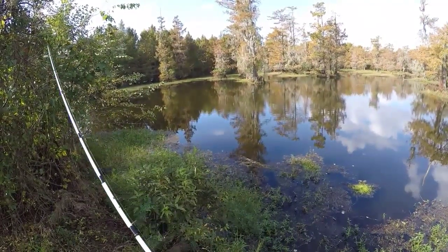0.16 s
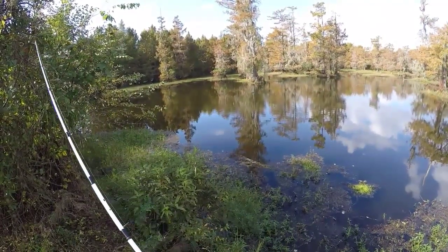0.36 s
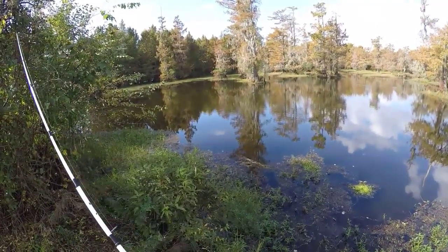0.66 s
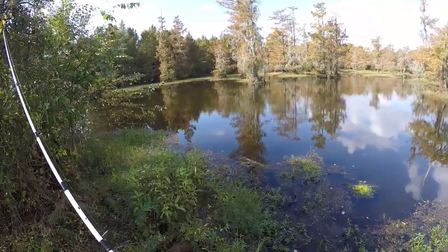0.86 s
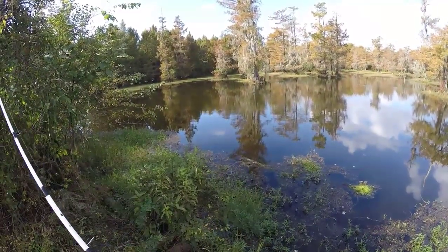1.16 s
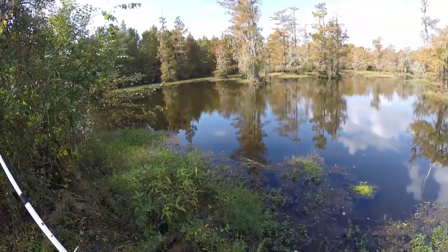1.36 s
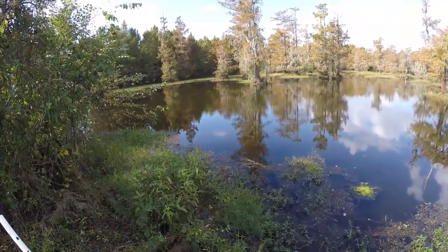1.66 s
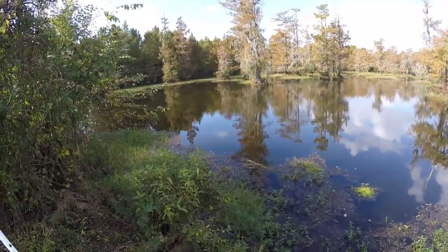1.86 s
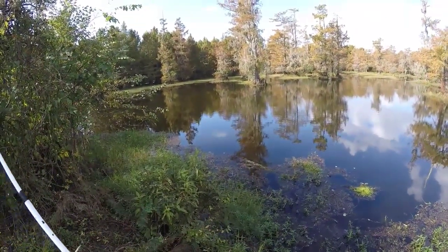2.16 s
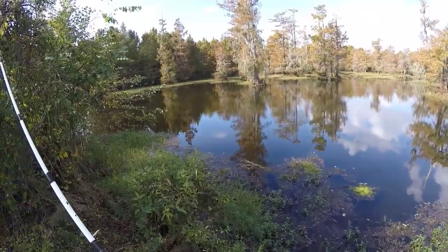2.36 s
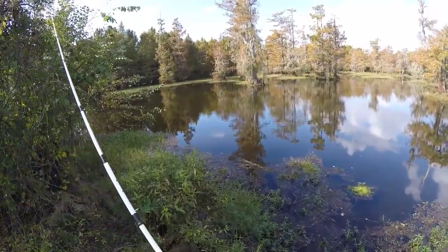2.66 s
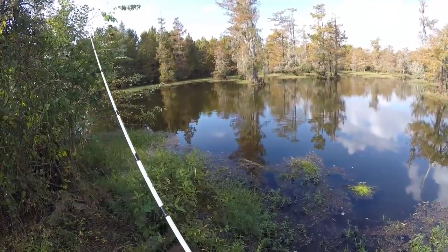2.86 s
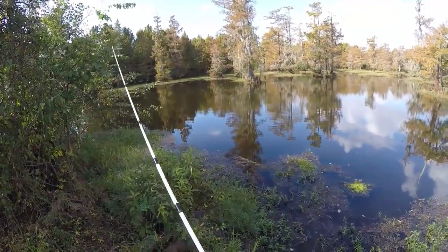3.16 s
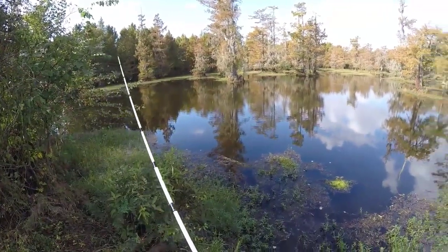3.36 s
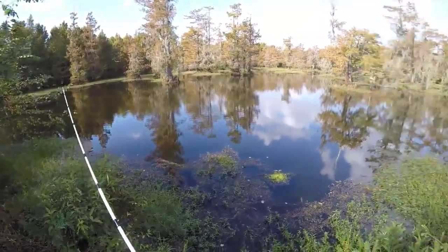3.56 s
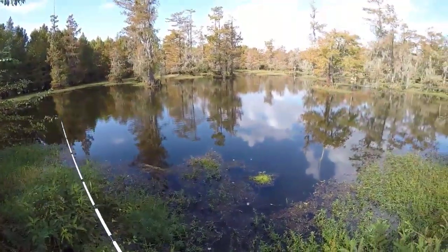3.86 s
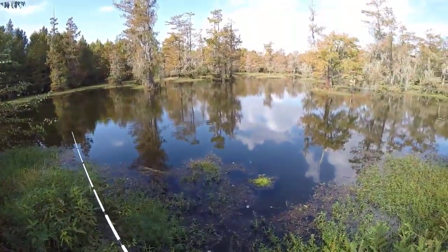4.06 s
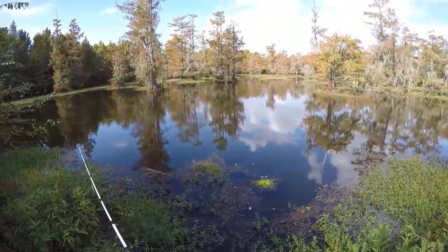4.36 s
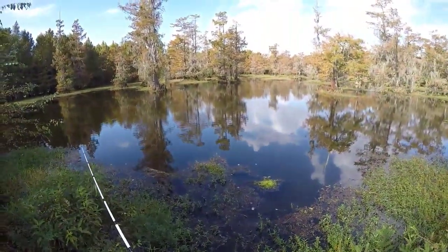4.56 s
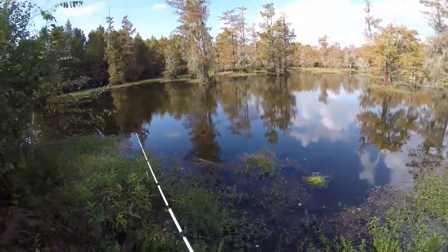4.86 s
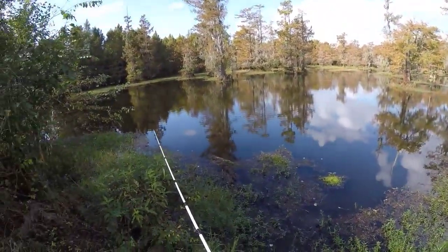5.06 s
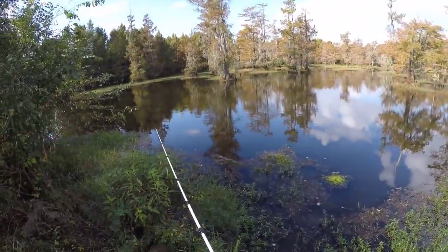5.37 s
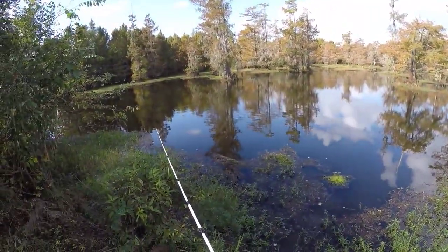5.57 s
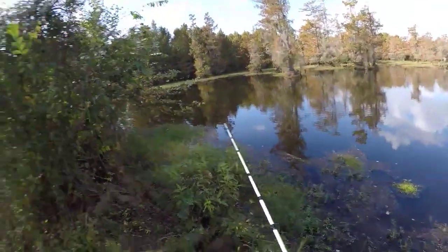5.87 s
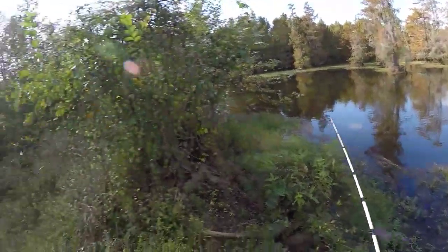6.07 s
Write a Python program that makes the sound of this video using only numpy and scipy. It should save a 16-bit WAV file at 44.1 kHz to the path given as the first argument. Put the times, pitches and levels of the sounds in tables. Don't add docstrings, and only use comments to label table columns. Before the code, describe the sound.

Far traffic rumble and a steady engine drone behind faint high cricket chirps and a dry katydid buzz, with one sharp handling knock midway.

```python
import sys
import numpy as np
from scipy import signal
from scipy.fft import rfft, irfft, next_fast_len
from scipy.io import wavfile
from scipy.ndimage import uniform_filter1d, map_coordinates

SR = 44100
rng = np.random.default_rng(int(sys.argv[2]) if len(sys.argv) > 2 else 0)


def natural_amplitude(level_db):
    exponent = np.asarray(level_db, float) / 20
    return 10 ** exponent


def generate_wav(signal):
    frames = np.transpose(np.atleast_2d(signal))
    scaled = np.clip(frames, -1, 1) * 32767
    pcm = np.round(scaled).astype(np.int16)
    wavfile.write(sys.argv[1], SR, pcm)


N = 273420


def unit(x):
    return x / np.sqrt(np.mean(x ** 2) + 1e-20)


def curves(rows):
    s, *columns = np.transpose(rows)
    return [np.interp(np.arange(N) / SR, s, column) for column in columns]


def wobble(rate):
    knots = rng.standard_normal(int(N * rate / SR) + 4)
    return map_coordinates(knots, [np.arange(N) * rate / SR])


def bumps(rows):
    t = np.arange(N) / SR
    return sum(height * np.exp(-((t - s) / width) ** 2) for s, width, height in rows)


def add(track, s, piece):
    start = max(round(s * SR), 0)
    track[start:start + len(piece)] += piece[:max(len(track) - start, 0)]


def filtered(x, response):
    m = next_fast_len(N + SR // 2)
    return irfft(rfft(x, m) * response(np.fft.rfftfreq(m, 1 / SR)), m)[:N]


def resonances(modes):
    def response(f):
        total = 0
        for k, (centre, width, db) in enumerate(modes):
            damping = 1j * f * width
            total = total + (-1) ** k * natural_amplitude(db) * damping / (centre * centre - f * f + damping)
        return total
    return response


def ringing_noise(modes):
    return unit(filtered(rng.standard_normal(N), lambda f: resonances(modes)(f) ** 2))


def rush(spectrum, patchy_db):
    z = signal.stft(rng.standard_normal(N + 512), nperseg=512)[2]
    field = uniform_filter1d(rng.standard_normal(z.shape), size=6, axis=0)
    field = uniform_filter1d(field, size=14, axis=1)
    x = signal.istft(z * natural_amplitude(patchy_db * unit(field)), nperseg=512)[1][:N]
    hz, db = np.transpose(spectrum)
    return unit(filtered(x, lambda f: natural_amplitude(np.interp(np.log(f + 1), np.log(hz + 1), db))))


def note(length, start_hz, end_hz, sharp, bend):
    u = np.linspace(0, 1, max(round(length * SR), 8))
    turns = np.cumsum(start_hz + (end_hz - start_hz) * u ** bend) / SR + rng.random()
    return np.sqrt(2) * np.abs(np.sin(np.pi * u)) ** sharp * np.sin(2 * np.pi * turns)


def grass(x, t60):
    t = np.arange(SR // 2) / SR
    tail = rng.standard_normal(len(t)) * natural_amplitude(-60 * t / t60)
    return signal.fftconvolve(x, tail / np.linalg.norm(tail))[:N]


def distance():
    # (frequency [Hz], density [dB per Hz])
    rumble_colour = [(9, -44), (15, -3), (25, -2), (34, -4), (42, -3), (55, -0.5), (78, -2), (97, -10),
                     (130, -28), (300, -97)]
    exhaust_colour = [(60, -47), (95, -3.5), (112, 0.5), (142, -2), (152, -7.5), (190, -8.5), (210, -14),
                      (300, -22.5), (600, -59)]
    roar_colour = [(150, -36), (250, -7.5), (420, -8), (520, -7.5), (680, -1), (750, 1), (850, -4.5),
                   (1000, -12.5), (1250, -20), (1900, -30.5), (3200, -47), (6000, -56)]
    tyre_colour = [(600, -47), (900, -3), (1050, -0.5), (1300, -4.5), (1700, -11.5), (2400, -40),
                   (5000, -70)]
    air_colour = [(600, -42), (1500, 2.5), (3000, 0), (5600, -2.5), (7400, -5.5), (9200, -7), (14500, -9),
                  (16000, -9)]
    # (time [s], level [dB])
    lorries = [(0, -48), (.4, -45), (.75, -50), (1, -43.5), (1.35, -48), (1.9, -44.5), (2.6, -45.5),
               (3.1, -47), (4, -43), (4.7, -46.5), (5.2, -43.5), (5.75, -47.5), (6.2, -45.5)]
    # (time [s], hiss level [dB])
    cars = [
        (0, -65),
        (.65, -59.5),
        (1.8, -66),
        (3.6, -67),
        (4.2, -67),
        (4.85, -66),
        (5.4, -68.5),
        (6.2, -63),
    ]
    # (middle [s], half width [s], rise [dB])
    revs = [
        (.45, 0.34, 3),
        (1.45, 0.29, 3.3),
        (2.85, 0.38, 2.9),
        (3.55, 0.39, 4),
        (4.45, 0.24, 0.68),
        (5.8, 0.19, 2.4),
    ]

    (rumble_db,), (tyre_db,) = curves(lorries), curves(cars)
    rumble = natural_amplitude(rumble_db + 4.0 + 0.19 * wobble(5.4)) * rush(rumble_colour, patchy_db=0.48)
    idle = natural_amplitude(rumble_db - 4) * ringing_noise([(31.8, 11.7, 0)])
    exhaust = natural_amplitude(-53.5 + bumps(revs) + 3.0) * rush(exhaust_colour, patchy_db=0.0)
    roar_db = -51 + 0.087 * (tyre_db - tyre_db.mean())
    roar = natural_amplitude(roar_db - 0.9 + 0.057 * wobble(4.37)) * rush(roar_colour, patchy_db=1.33)
    tyres = natural_amplitude(tyre_db - 3.0) * rush(tyre_colour, patchy_db=3.5)
    air = natural_amplitude(-67) * rush(air_colour, patchy_db=0.47)
    return rumble + idle + exhaust + roar + tyres + air


def engine():
    # (shaft order [multiple of shaft rate], level [dB rms])
    drone = [(3, -65.5), (6, -79.5), (10, -76), (12, -67.5), (13, -78), (14, -60.5), (15, -71), (16, -61.5),
             (17, -70.5), (18, -60.5), (19, -66), (20, -95), (22, -78), (24, -74.5)]
    shaft_hz = 45.97
    turns = np.cumsum(shaft_hz + 0.026 * wobble(1.443)) / SR
    out = np.zeros(N)
    for order, db in drone:
        level = np.sqrt(2) * natural_amplitude(db + 1.1 * wobble(2.36))
        out += level * np.sin(2 * np.pi * (round(order) * turns + rng.random()))
    return out


def bird():
    # (time [s], level [dB])
    chips = [
        (.636, -65.5),
        (.656, -73),
        (.852, -76),
    ]
    pip_pitches = (5000, 4030)
    # (time [s], pitch [Hz], level [dB])
    warble = [
        (4.79, 3850, -95),
        (4.812, 3790, -76),
        (4.832, 3800, -82),
        (4.853, 3880, -70),
        (4.875, 3510, -77),
        (4.9, 3660, -75),
        (4.94, 3720, -79),
        (5.01, 3780, -86),
        (5.14, 3500, -88),
    ]

    pitch_hz, level_db = curves(warble)
    sings = np.arange(N) < warble[-1][0] * SR
    turns = np.cumsum(pitch_hz + 45 * wobble(50)) / SR
    out = np.sqrt(2) * sings * natural_amplitude(level_db + 3.3 * wobble(60)) * np.sin(2 * np.pi * turns)
    for s, db in chips:
        add(out, s, natural_amplitude(db) * note(.015, 5050, 4400, sharp=.6, bend=1))
    for k in range(3):
        for hz in pip_pitches:
            add(out, 4.782 + .061 * k, natural_amplitude(-70 - 4.5 * k) * note(.03, hz, hz, sharp=0.76, bend=1))
    echo = np.roll(grass(out, t60=.3), round(.025 * SR))
    return out * natural_amplitude(wobble(70)) + natural_amplitude(-4) * echo


def chirp(length, db, hz, period, sag_hz, scatter_db):
    out = np.zeros(SR // 8)
    for k, t in enumerate(np.linspace(0, length, round(length / period) + 1)):
        pitch_hz = hz + rng.normal(0, 30)
        size = natural_amplitude(db - 2.5 - 2 * (k == 0) + rng.normal(0, scatter_db))
        add(out, t, size * note(0.0068, pitch_hz + 70, pitch_hz - sag_hz, sharp=0.39, bend=5.4))
    return out


def crickets():
    near = [
        0.0844,
        0.433,
        0.822,
        1.2196,
        1.5805,
        1.946,
    ]
    # (time [s], length [s], level [dB])
    steady = [(.218, .057, -65), (0.495, .07, -66.5), (.7556, .06, -68), (1.036, 0.049, -65.5),
              (1.305, .088, -68), (1.825, .055, -68), (2.0856, .055, -65.5), (2.3436, .042, -68),
              (2.5775, .06, -67), (2.818, .055, -66), (3.058, .052, -66), (3.311, .046, -66.5),
              (3.562, .045, -67), (3.819, .03, -70), (4.0416, .055, -69), (4.267, 0.043, -71),
              (4.4817, .047, -67.5), (4.735, .068, -70), (5.061, .047, -67), (5.32, .045, -66),
              (5.5686, .049, -66.5), (5.8315, .053, -68), (6.076, .098, -66)]
    brief = [.002, .385, .7132, .8775, 1.1994, 1.5435, 1.7409, 1.9168, 2.302, 2.4858, 2.68, 4.192, 4.345,
             4.6, 4.915, 5.1871, 5.4494, 5.6924, 5.807, 5.9474, 5.965]
    # (time [s], level [dB], pitch [Hz])
    far = [(.51, -70, 7900), (.525, -74, 7350), (.79, -70, 7950), (.74, -76, 7400), (.93, -76, 7400),
           (1.095, -71, 7860), (1.15, -73, 7350), (1.37, -74, 7450), (1.424, -71, 7950), (1.593, -71, 7500),
           (5.39, -75, 8000), (5.92, -76, 8800), (5.975, -73, 8000), (6.065, -66, 7700), (6.115, -69, 9150),
           (6.12, -71, 7600)]

    brief_run = [3.1615 + .1228 * k for k in range(7)]
    others = [(s, length, db, 8265) for s, length, db in steady]
    others += [(s, 0.019, -70, 8340) for s in brief + brief_run]
    others += [(s, .036, db, hz) for s, db, hz in far]

    out = np.zeros(N)
    lead = .0037
    for s in near:
        add(out, s - lead, chirp(.05, -59.5, 8560, period=.0099, sag_hz=380, scatter_db=.8))
    for s, length, db, hz in others:
        add(out, s - lead, chirp(length, db, hz, period=.0092, sag_hz=1150, scatter_db=1.8))
    return out + natural_amplitude(-9) * grass(out, t60=.12)


def wing_noise(modes):
    scrape = rush([(7000, -60), (9600, -4), (11000, 3), (16000, 0)], patchy_db=0.8)
    return unit(filtered(scrape, resonances(modes)))


def katydid():
    # (start [s], end [s], level [dB], lag at start [strokes], lag at end [strokes], brightness [dB])
    songs = [
        (-1, 2.37, -74, 0.28, .39, -2.5),
        (4.12, 6.22, -73.5, .46, 0.23, -1.5),
    ]
    # (time [s], peak level [dB])
    ticks = [
        (2.4498, -71),
        (2.5227, -69),
        (2.913, -57),
        (3.1313, -59),
        (3.267, -58),
    ]
    # (time [s], peak level [dB])
    snaps = [
        (2.9871, -61),
        (3.0485, -59),
    ]
    # (frequency [Hz], width [Hz], level [dB])
    wing = [(10200, 500, -5), (11330, 400, -2), (11800, 160, -7), (12220, 230, -2.5), (12720, 220, -5),
            (13200, 290, -8)]
    wing_tip = [(13100, 500, -11), (13720, 220, 5), (14600, 450, 2), (15200, 500, 4)]
    stroke_hz, swell_db = 26.9, 9

    t = np.arange(N) / SR
    effort, bright_db = np.zeros(N), np.zeros(N)
    for start, end, db, lag_from, lag_to, tip_db in songs:
        warming = np.clip(1 + (start - t) / 0.55, 0, 1)
        fade_db = 60 * np.clip(t - end + 0.22, 0, None)
        level = (t > start) * natural_amplitude(db - swell_db * warming ** 2 - fade_db)
        tiring = 0.28 * np.clip(1 + (t - end) / .35, 0, None) ** 2
        lag = np.interp(t, [start, end], [lag_from, lag_to]) + tiring
        stroke = (.5 + .5 * np.cos(2 * np.pi * (stroke_hz * t - lag))) ** 0.71
        effort += level * (0.24 + stroke) * 1.14
        bright_db += (tip_db - swell_db * warming) * ((t > start) & (t < end))

    tick_run = [(3.375 + .1053 * k, -58.5) for k in range(7)]
    for s, db in ticks + tick_run:
        add(effort, s - .006, natural_amplitude(db - 12.0) * np.hanning(round(SR * .0336)) ** 0.34)
    early = effort * natural_amplitude(1.1 * wobble(25)) * wing_noise(wing)
    late_effort = np.roll(effort, round(0.0065 * SR))
    late = late_effort * natural_amplitude(bright_db + 1.2 * wobble(25)) * wing_noise(wing_tip)

    snap_level = np.zeros(N)
    for s, db in snaps:
        add(snap_level, s - .002, natural_amplitude(db - 5) * np.hanning(round(.009 * SR)))
    return early + late + snap_level * ringing_noise([(14800, 1100, 0)])


def rustle():
    # (frequency [Hz], density [dB per Hz])
    sleeve = [(300, -30), (800, -5), (1200, -10), (1650, 7), (2100, -6), (2500, -3), (3500, -11),
              (5000, -12), (7000, -32), (12000, -58)]
    # (middle [s], half width [s], level [dB])
    rubs = [
        (5.9, 0.025, -63),
        (6.025, 0.044, -60.5),
        (6.17, 0.028, -62),
    ]
    strokes = bumps([(s, width, natural_amplitude(db)) for s, width, db in rubs])
    return strokes * natural_amplitude(1.6 * wobble(150)) * rush(sleeve, patchy_db=1.5)


def knocks():
    # (time [s], level [dB], contact time [ms], crack level [dB])
    taps = [(3.4893, -12.5, 0.54, -35.5), (3.4938, -26, .9, -68), (3.494, -24, 1.35, -70),
            (3.506, -22, 1.4, -69), (3.486, -40, .3, -49), (5.8815, -24.5, 0.99, -57),
            (5.8832, -25, 0.66, -47), (5.886, -34, 0.75, -72), (5.8891, -27.5, 0.55, -47),
            (5.892, -30, 2.2, -59), (5.895, -39, 0.5, -55), (6.1032, -42, 0.25, -56)]
    # (frequency [Hz], width [Hz], level [dB])
    case = [(142, 45, -3), (370, 84, -1), (478, 42, 2), (800, 330, 6.5), (990, 540, -5.5), (1760, 50, -0.5),
            (2570, 220, -1), (3320, 690, -15)]
    # (time [s], length [s], pitch [Hz], level [dB])
    nudges = [(3.284, 0.016, 714, -35), (3.29, 0.011, 900, -44.5), (3.392, 0.016, 760, -38.5),
              (3.405, 0.026, 670, -43), (3.473, 0.011, 750, -41), (3.4873, 0.0034, 1670, -26.5),
              (3.488, 0.0037, 2980, -39.5), (5.8804, 0.0042, 1560, -36.5), (5.882, 0.012, 670, -37.5),
              (5.886, 0.0078, 200, -43), (5.887, 0.01, 2930, -54), (6.1012, 0.0034, 1640, -42),
              (6.102, .008, 1800, -57), (6.018, 0.011, 1640, -58), (6.03, .012, 1600, -58),
              (6.1015, .003, 3080, -56)]

    force, crack = np.zeros(N), np.zeros(N)
    t = np.arange(SR // 3) / SR
    for s, db, contact_ms, crack_db in taps:
        push = np.hanning(round(contact_ms * SR / 1000) + 3)
        add(force, s - len(push) / SR / 2, natural_amplitude(db + 27.5) * push / push.sum())
        add(crack, s - .001, natural_amplitude(crack_db - 60 * t / 0.015) * (1 - np.exp(-t / 0.00036)))
    body = filtered(force, resonances(case))
    out = body + crack * ringing_noise([(3150, 610, 0.3), (4770, 3800, 0)])
    out = filtered(out, lambda f: 1 / (1 + (f / 5550) ** 16))
    for s, length, hz, db in nudges:
        add(out, s, natural_amplitude(db) * note(length, hz, hz, sharp=0.65, bend=1))
    metal = natural_amplitude(-48 - 60 * t / 0.27) * np.sin(2 * np.pi * 1858 * t)
    metal += natural_amplitude(-66 - 60 * t / 0.18) * np.sin(2 * np.pi * 2740 * t)
    add(out, 3.4895, metal)
    return out


def scene():
    background = distance() + engine() + bird()
    insects = crickets() + katydid()
    handling = rustle() + knocks()
    return (background + insects + handling)[None]


def low_pass(x):
    return signal.sosfilt(signal.butter(12, 16170, fs=SR, output="sos"), x)


def record(dry):
    mix = filtered(dry[0], lambda f: f < 15330)[None]
    return low_pass(mix)


dry = scene()
out = record(dry)
generate_wav(out)
```